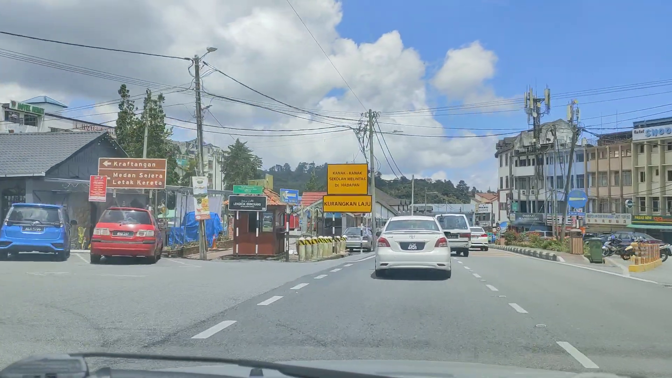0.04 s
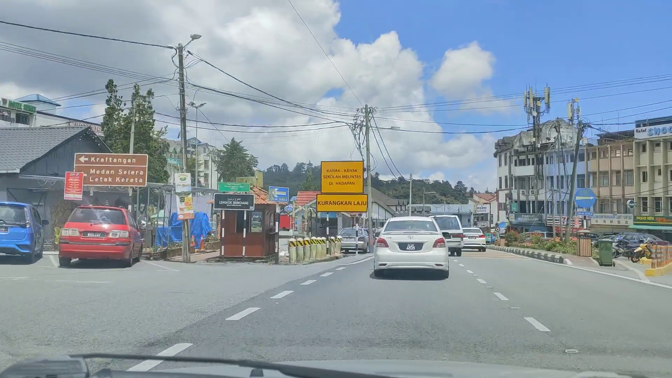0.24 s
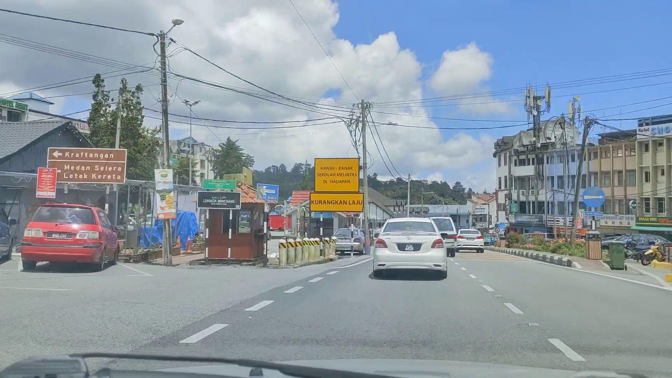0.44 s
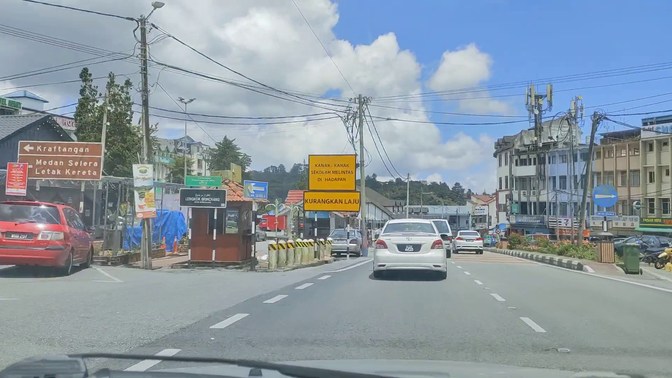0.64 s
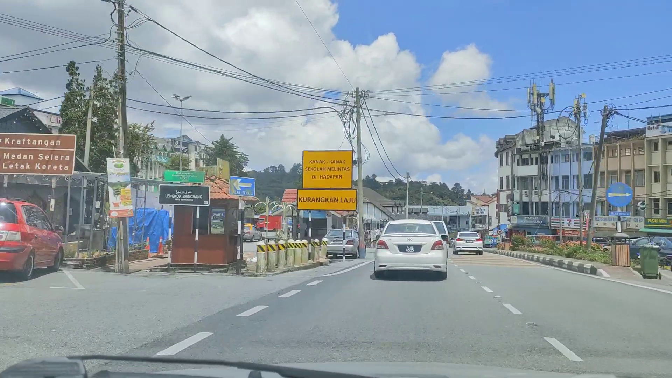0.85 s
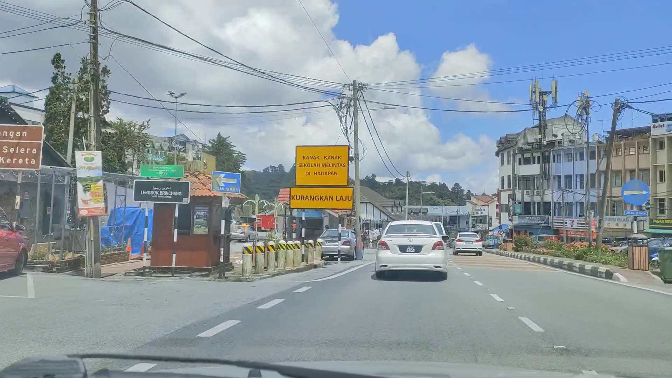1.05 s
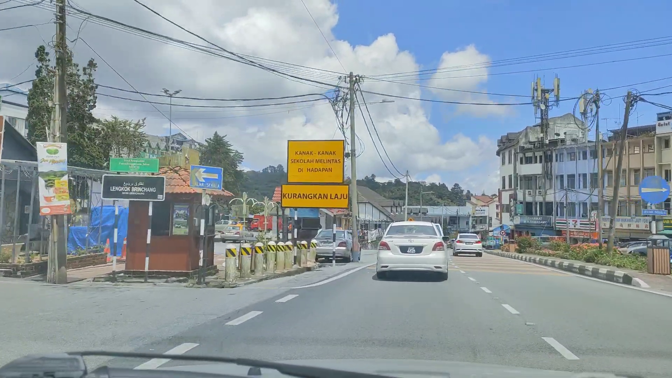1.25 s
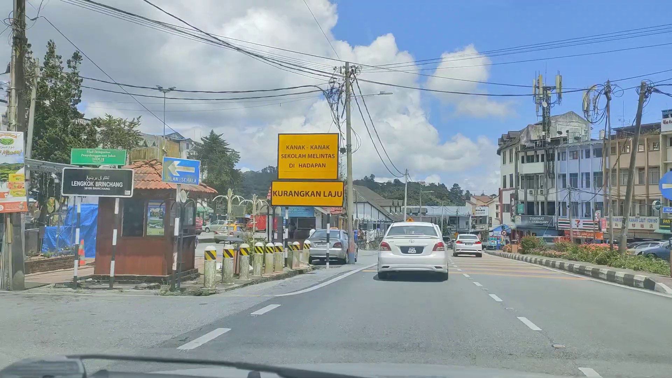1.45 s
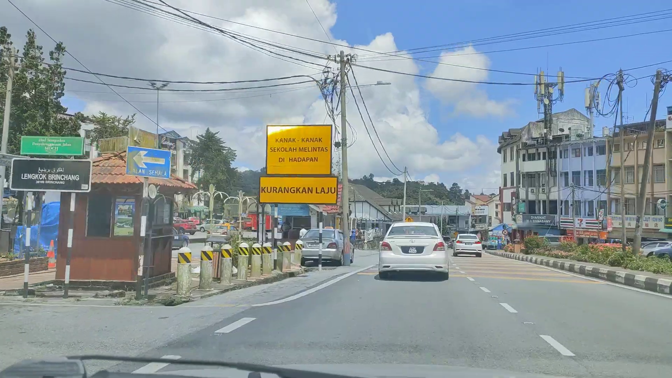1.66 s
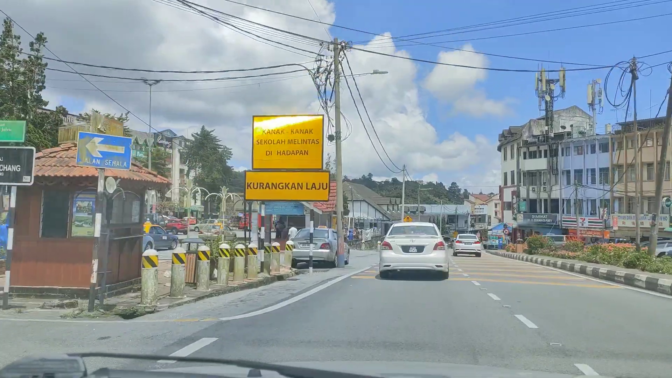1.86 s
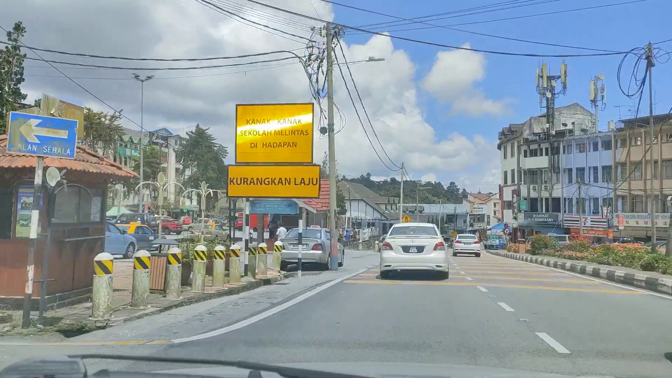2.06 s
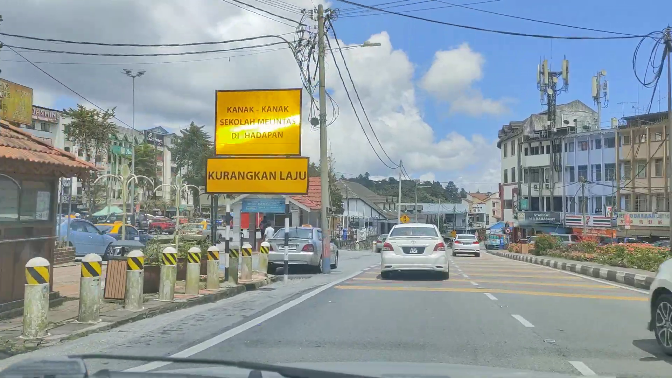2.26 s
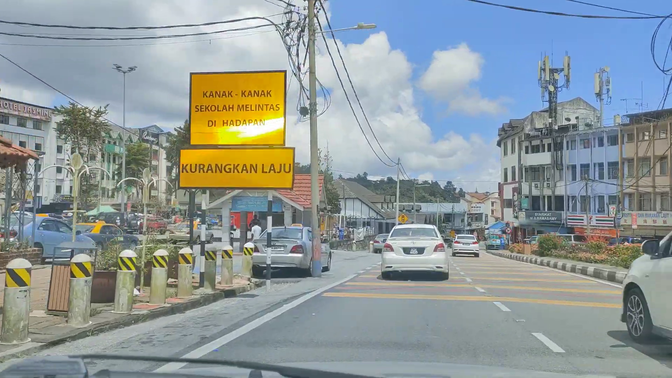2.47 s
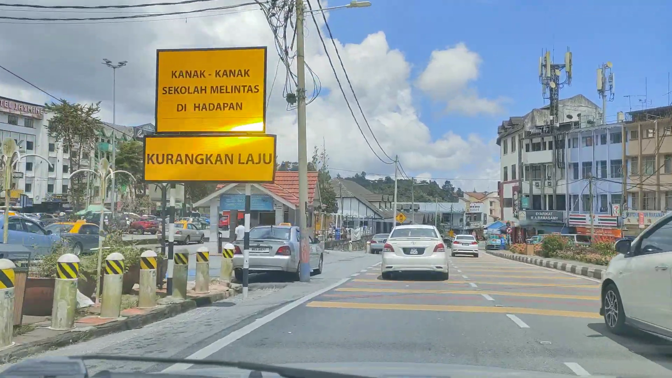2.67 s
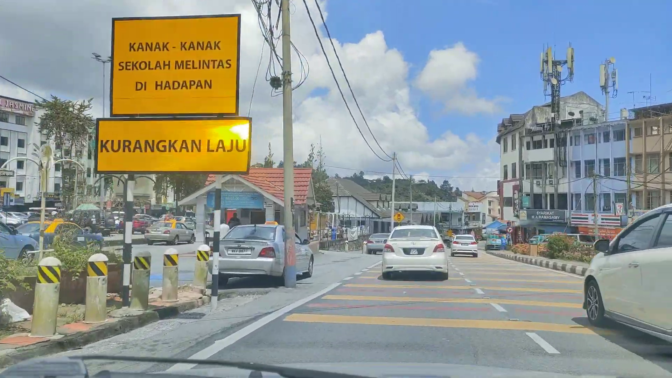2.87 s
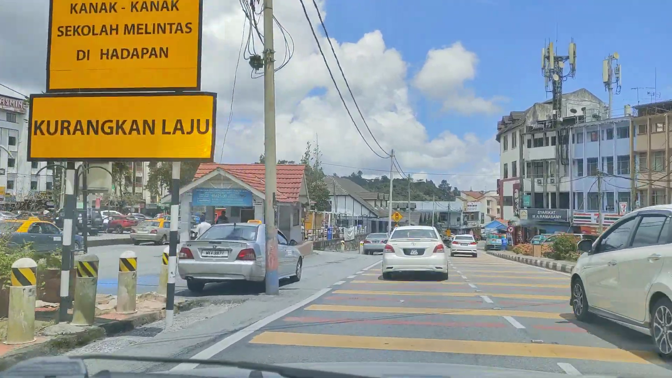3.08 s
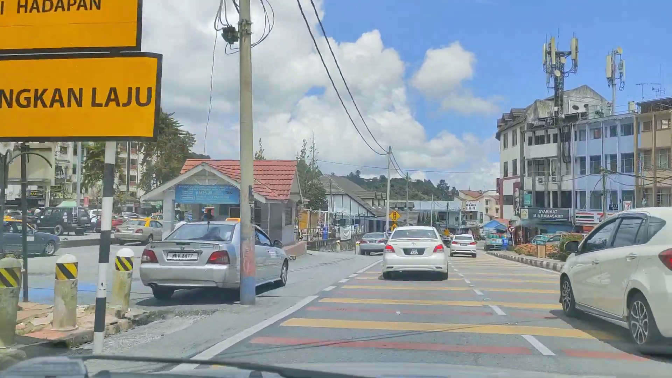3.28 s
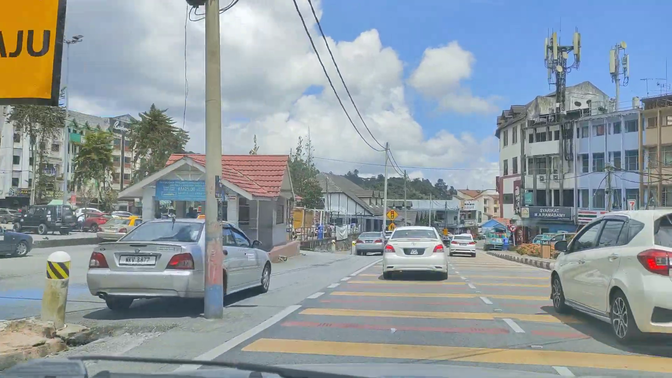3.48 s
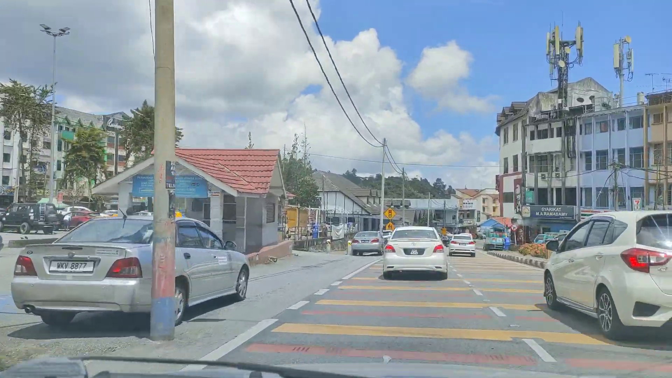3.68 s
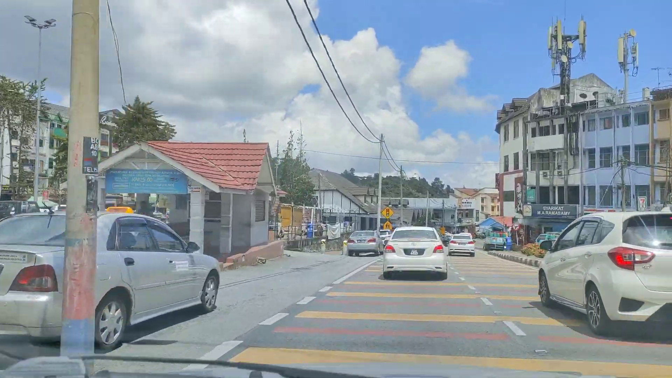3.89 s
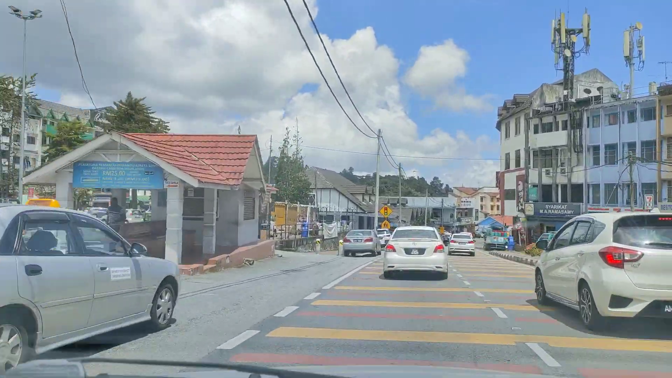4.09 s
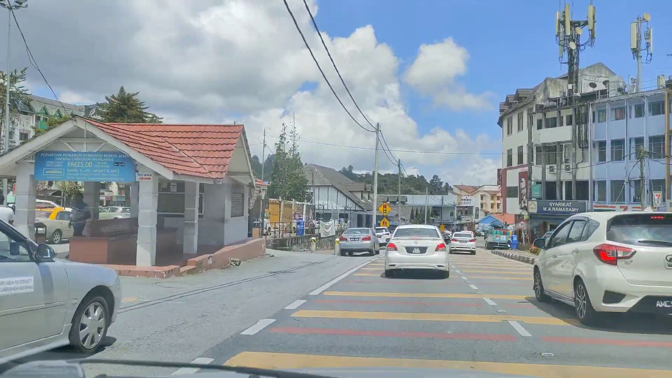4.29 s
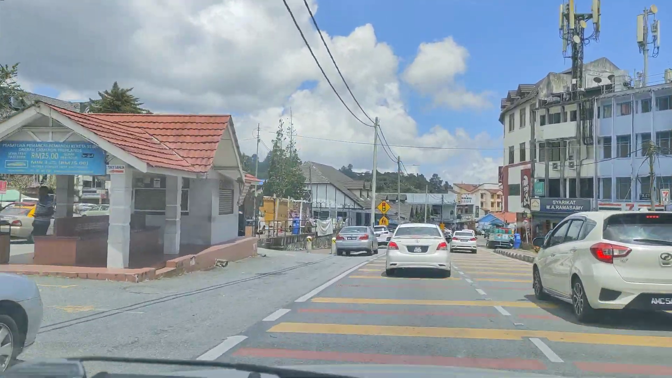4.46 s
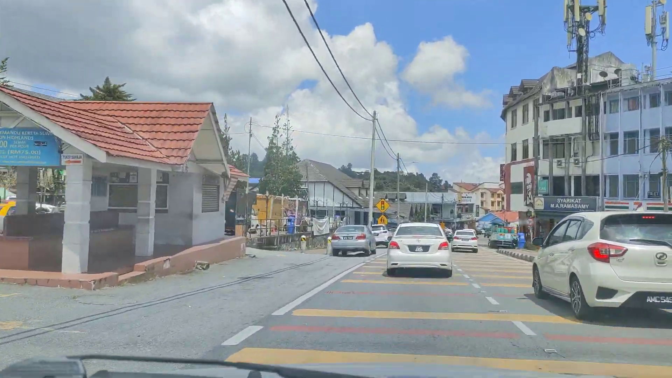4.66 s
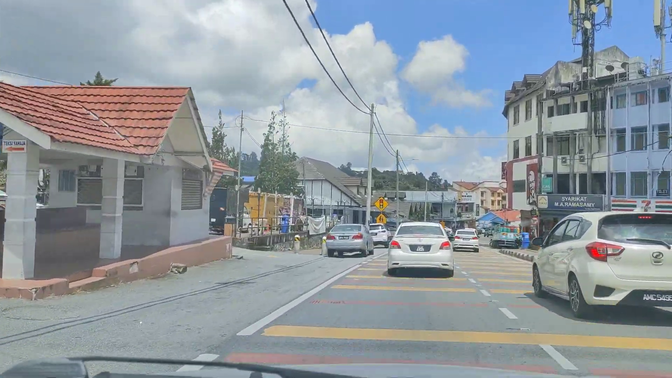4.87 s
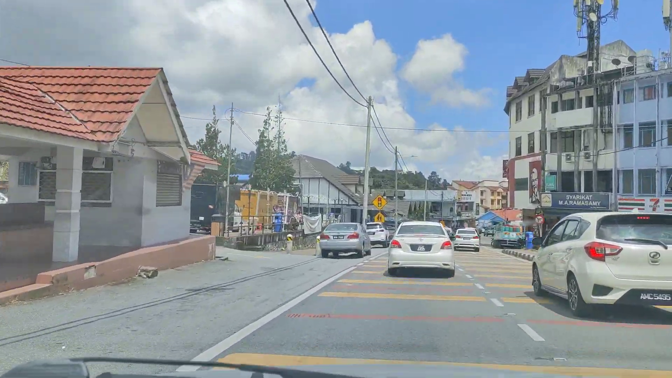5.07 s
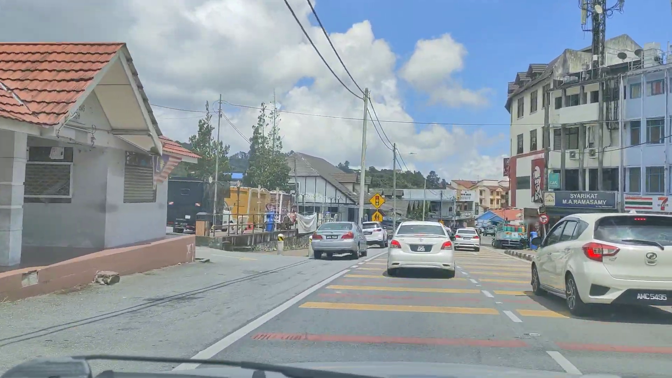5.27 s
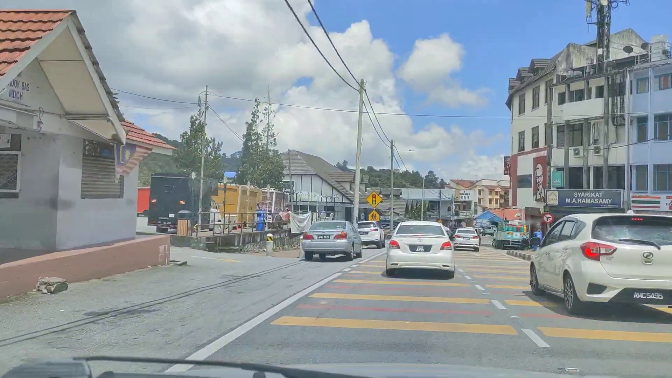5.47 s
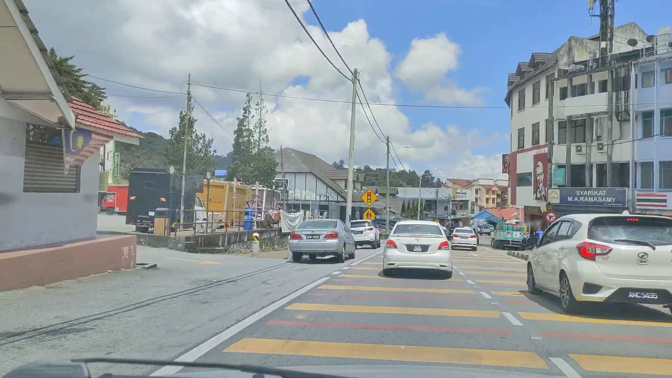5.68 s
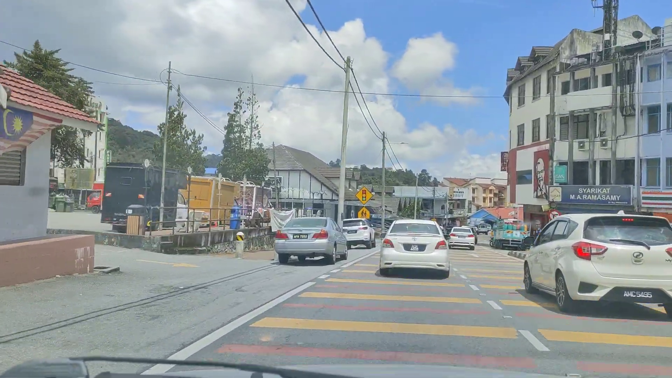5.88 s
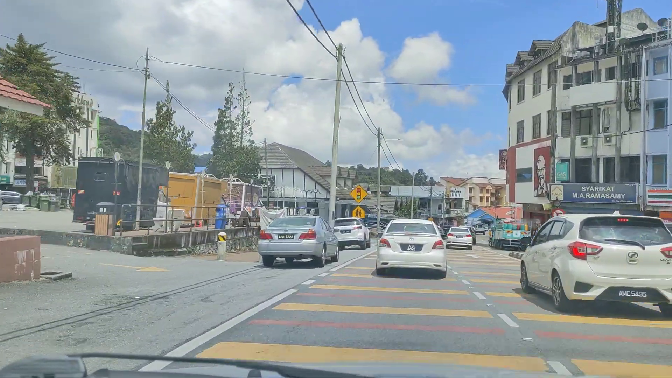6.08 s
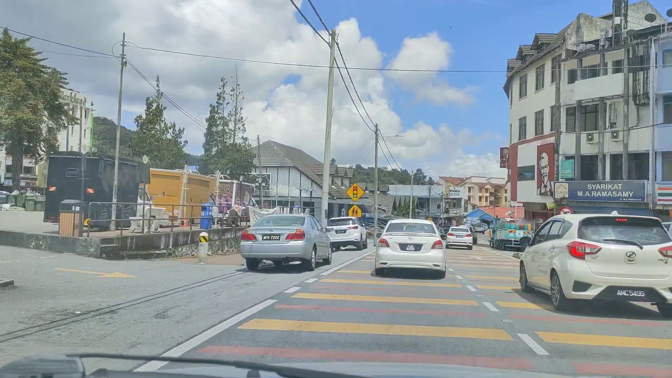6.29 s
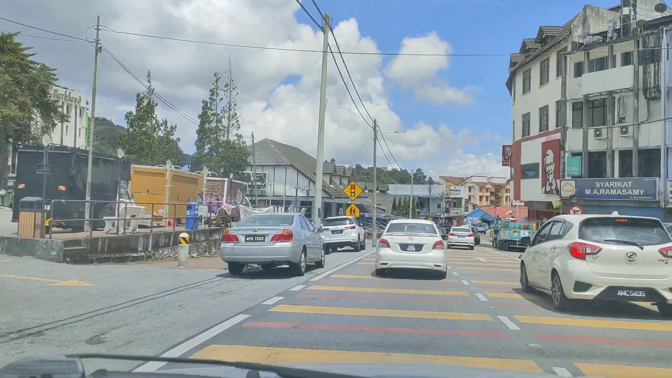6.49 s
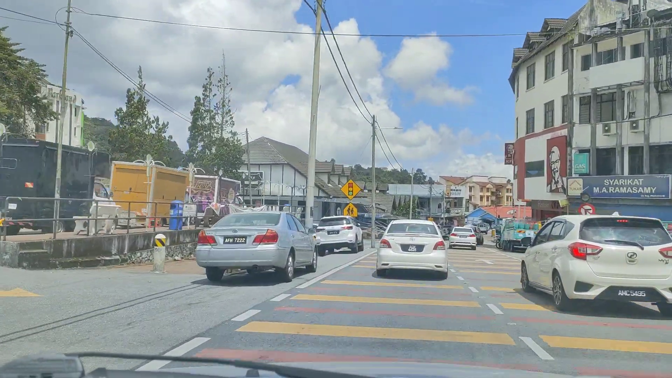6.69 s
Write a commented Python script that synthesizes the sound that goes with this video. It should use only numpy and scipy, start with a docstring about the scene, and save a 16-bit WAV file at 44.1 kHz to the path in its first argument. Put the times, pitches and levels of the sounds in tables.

```python
"""Tyre hum, with street rush and hiss, inside a slow car; a vehicle on the right adds a hollow roar.
The street fades, faint rubs chirp, then raised stripes make the cabin rumble, boom, knock and squeak.
Road, traffic and trim are shaped stereo noise; knocks, thuds and panels are struck modes; the squeak is a sine.
Table levels are relative: layer trims, filters and channel balance are applied after them."""
import sys
import numpy as np
from scipy import signal
from scipy.fft import irfft, next_fast_len
from scipy.io import wavfile
from scipy.ndimage import uniform_filter1d

SR = 44100
rng = np.random.default_rng(int(sys.argv[2]) if len(sys.argv) > 2 else 0)


def unload_audio(sound):
    """Save the sound as a 16-bit wav file, at the path given as the first command line argument."""
    columns = np.transpose(np.atleast_2d(sound))
    # keep every value between -1 and 1, then stretch to whole-number steps
    steps = np.round(np.clip(columns, -1, 1) * 32767)
    wavfile.write(sys.argv[1], SR, steps.astype(np.int16))


N = 297234
TIME = np.arange(N) / SR
PORT_LAG_S = 0.00043  # greatest delay between the two microphone ports


def from_db(db):
    """Decibels to gain."""
    return 10 ** (np.asarray(db) / 20)


def rms_one(x):
    """Scale to unit power."""
    return x / np.sqrt(np.mean(x ** 2) + 1e-20)


def filtered(x, order, hz, kind="low"):
    """Butterworth filter."""
    return signal.sosfilt(signal.butter(order, hz, kind, fs=SR, output="sos"), x)


def in_time(rows):
    """Each column of a curve, sample by sample."""
    s, *columns = np.transpose(rows)
    return [np.interp(TIME, s, column) for column in columns]


def at_hz(points, freqs):
    """A table read on a log-frequency axis."""
    hz, value = np.transpose(points)
    return np.interp(np.log(freqs), np.log(hz), value)


def cabin_colour(freqs, ripple_db=2.5, width_hz=28):
    """Reflections between windows and dashboard give each source fine peaks and dips in the treble."""
    ripple = np.interp(freqs / width_hz, np.arange(4000), rng.standard_normal(size=4000))
    return ripple_db * ripple * np.clip(freqs / 4000, 0, 1)


# likeness of the two ports: freq_hz, direct_share (sound straight from the sides)
DIRECT = [(60, 1), (200, 1), (450, 0.94), (1100, 0.44), (2300, 0.32), (3300, 0.37), (4500, 0.088),
          (8000, 0.052)]
# standing waves across the cabin, opposite in sign at the ports: freq_hz, width_hz, gain_db
CROSS_WAVES = [(660, 70, 1), (920, 81, 5.5), (1120, 150, 8.5), (1380, 70, 8)]


def cabin_noise(spectrum, tilt_db=0, from_right=0, standing=1, size=N):
    """Unit-power stereo noise: direct from the sides, partly diffuse, stirring the standing waves."""
    freqs = np.maximum(np.fft.rfftfreq(2 * next_fast_len(size // 2 + 1), 1 / SR), 1)
    octaves_outside = np.abs(np.log2(freqs / np.clip(freqs, spectrum[0][0], spectrum[-1][0])))
    shape_db = at_hz(spectrum, freqs) - 20 * octaves_outside + tilt_db * np.log2(freqs)
    gain = from_db(shape_db + cabin_colour(freqs))

    turn = 2 * np.pi * freqs * PORT_LAG_S
    lean = np.clip(from_right, -1, 1)
    alike = np.clip(at_hz(DIRECT, freqs), 0, 1) * (np.cos(turn) + 1j * lean * np.sin(turn))
    real, imaginary = rng.standard_normal((2, 2, len(freqs)))
    left, diffuse = (real + 1j * imaginary) * gain
    right = alike * left + np.sqrt(np.maximum(1 - np.abs(alike) ** 2, 0)) * diffuse

    across_db = sum(db / (1 + (2 * (freqs - hz) / width) ** 2) ** 2 for hz, width, db in CROSS_WAVES)
    difference = from_db(standing * across_db) * (left - right)
    return rms_one(irfft(left + right + difference * [[1], [-1]])[:, :size])


def steady(x, size):
    """Hold the power of a noise even over a span of samples."""
    return x / np.sqrt(uniform_filter1d(np.mean(x ** 2, axis=0), size) + 1e-9)


def grains(per_s, fade_s, spread_db):
    """Envelope of many small random contacts, each with a sharp start; unit power."""
    strength_db = abs(spread_db) * np.minimum(rng.exponential(1, N), 3)
    hits = (rng.random(N) < per_s / SR) * from_db(strength_db) ** 2
    power = signal.lfilter([1], [1, -np.exp(-1 / (fade_s * SR))], hits + 1e-12)
    return rms_one(np.sqrt(power))


def ring(clicks, hz, t60_s):
    """Two-pole resonator: each click sets off a dying sine."""
    r, w = from_db(-60 / (t60_s * SR)), 2 * np.pi * hz / SR
    return signal.lfilter([0, np.sin(w)], [1, -2 * r * np.cos(w), r * r], clicks + 1e-18)


def swell(start_s, hold_s, attack_s, t60_s):
    """Envelope that rises, holds for a length of time and dies away."""
    age = np.maximum(TIME - start_s, 0)
    return (1 - np.exp(-age / attack_s)) * from_db(-60 * np.clip((age - hold_s) / t60_s, 0, 4))


def burst(start_s, attack_s, t60_s):
    """Envelope of one blow: a quick rise and an even decay."""
    return swell(start_s, 0, attack_s, t60_s)


# tyres on smooth asphalt as the car slows: time_s, sway_db, hum_db
ROLL = [(0.12, -42, -38), (0.28, -50, -37.5), (1.15, -53, -36.5), (1.55, -49.5, -39), (2.05, -54, -40.5),
        (2.6, -57.5, -42), (3.2, -61, -41), (3.85, -55, -41.5)]
# traffic outside, falling behind: time_s, rush_db, hiss_db
TRAFFIC = [(0, -48, -57.5), (0.2, -48.5, -50.5), (0.7, -48, -58), (1.15, -49, -56), (1.6, -53.5, -60.5),
           (2.15, -55, -60.5), (2.7, -55.5, -67), (3.45, -54, -63), (3.85, -55.5, -62.5)]
# spectra of body sway, tyre hum and street noise: freq_hz, density_db (per Hz)
SWAY = [(18, -14), (33, -6), (44, 12.5), (60, -5), (80, -9), (110, -20)]
HUM = [(55, -28), (82, -14.5), (102, -5.5), (150, -2.5), (195, -1), (245, -4), (295, -8.5), (350, -8.5),
       (420, -14), (500, -11), (600, -15), (750, -32), (1000, -27)]
RUSH = [(300, -26), (520, -3.5), (640, -4.5), (750, 0), (1020, -4.5), (1320, -5.5), (1500, -8.5),
        (1750, -11.5), (1900, -16.5), (2600, -20.5), (4000, -24)]
HISS = [(1200, -11), (1900, -3), (2450, 0.5), (3000, -5.5), (3700, -3), (4400, -10.5), (5100, -10),
        (5800, -12), (6500, -16.5), (7400, -30), (10000, -31.5), (13500, -56)]
AIR = [(2200, 1), (2650, -0.5), (3200, -7), (4500, -8.5), (5700, -4.5), (7000, -14), (10000, -20),
       (13500, -27.5)]


def smooth_road():
    """Tyre hum through the body, street rush, and hiss stronger on the right, all as shaped noise."""
    sway_db, hum_db = in_time(ROLL)
    rush_db, hiss_db = in_time(TRAFFIC)
    sway = from_db(sway_db) * steady(cabin_noise(SWAY), size=9000)
    hum = from_db(hum_db + 1.0) * steady(cabin_noise(HUM), size=11000)
    rush = from_db(rush_db + 5.0) * cabin_noise(RUSH, from_right=0.22)
    hiss = from_db(hiss_db + 1.5) * cabin_noise(HISS, from_right=0.38)
    # falls 15 dB per second as the traffic recedes
    air = from_db(-52.0 - 15.0 * TIME) * cabin_noise(AIR, from_right=0.96)
    return sway + hum + rush + (hiss + air) * from_db([[-.8], [.5]])


# tyre roar of the other vehicle, near and abreast: freq_hz, density_db (per Hz)
ROAR = [(480, -15), (600, -2.5), (740, -6), (880, 3.5), (1130, -6), (1300, -9), (1500, -19), (1950, -21),
        (2500, -10), (2950, -13), (3400, -20)]
ROAR_ABREAST = [(900, -6), (1040, 8), (1170, 6.5), (1330, 5), (1480, 1), (1750, -4), (2000, -22),
                (2800, -14), (3400, -17)]


def passing(fade_s=1.22, fade_width_s=0.15, abreast_s=1.08, abreast_width_s=0.4):
    """A vehicle on the right: hollow tyre roar, with a higher, grainy swell just before it drops behind."""
    nearness = 1 / (1 + np.exp(np.minimum((TIME - fade_s) / fade_width_s, 30)))
    abreast = np.exp(-((TIME - abreast_s) / abreast_width_s) ** 2)
    roar = from_db(-45.5) * nearness * cabin_noise(ROAR, from_right=0.68)
    upper_roar = from_db(-46.5) * abreast * cabin_noise(ROAR_ABREAST, from_right=0.99)
    upper_roar = upper_roar * grains(per_s=250, fade_s=.014, spread_db=0.0)
    return roar * from_db([[-.8], [.5]]) + upper_roar * from_db([[1.3], [-1.1]])


# faint chirps of rubbing trim: middle_s, pitch_hz, half_width_hz, level_db, length_s
CHIRPS = [(1.86, 1340, 220, -60, .08), (1.922, 4250, 200, -57.5, 0.03), (2.0, 4050, 240, -65, 0.18),
          (3.393, 910, 110, -57, .08), (3.4, 2600, 190, -64, 0.13), (3.418, 5120, 12, -72.5, .08),
          (4.95, 7000, 190, -68, .033), (5.024, 7000, 130, -70, 0.027), (5.604, 3670, 400, -56.5, 0.046),
          (6.07, 3700, 600, -59, 0.11), (6.185, 4160, 97, -62, .017)]


def chirps():
    """Brief rubs shake one narrow resonance each: band-passed noise under a bell-shaped envelope."""
    out, white = np.zeros((2, N)), rng.standard_normal((2, N))
    for middle_s, hz, half_width_hz, level_db, length_s in CHIRPS:
        near = np.abs(TIME - middle_s) < 2 * length_s
        tone = filtered(white[:, near], 2, [hz - half_width_hz, hz + half_width_hz], "band")
        bell = np.exp(-(2 * (TIME[near] - middle_s) / length_s) ** 2)
        out[:, near] += from_db(level_db) * bell * rms_one(tone)
    return out


# the squeak's upward glide: time_s, pitch_hz, level_db, overtone_db (relative to the fundamental)
SQUEAK = [(4.582, 5680, -54, -42), (4.597, 5870, -44, -43.5), (4.607, 5935, -47.5, -46),
          (4.64, 5940, -52, -46), (4.669, 5990, -51.5, -42), (4.705, 5980, -55, -40),
          (4.735, 5994, -60, -37), (4.765, 6030, -52, -37), (4.79, 6060, -58, -33), (4.809, 6105, -51, -37)]
SQUEAK_HOLD_S, SQUEAK_ATTACK_S, SQUEAK_T60_S = 0.229, .004, .05


def squeak(jitter=.0007, flutter_db=2.5):
    """A dry contact sticks and slips: one high, slightly unsteady sine with its octave."""
    hz, level_db, overtone_db = in_time(SQUEAK)
    waver = rms_one(filtered(rng.standard_normal((3, N)), 2, 70))
    phase = 2 * np.pi * np.cumsum(hz * (1 + jitter * waver[0])) / SR
    phase = phase - 2 * np.pi * hz * PORT_LAG_S * np.array([[1], [0]])  # right port first
    tone = np.sin(phase) + from_db(overtone_db) * np.sin(2 * phase)
    sounding = swell(SQUEAK[0][0], SQUEAK_HOLD_S, SQUEAK_ATTACK_S, SQUEAK_T60_S)
    return sounding * tone * from_db(level_db + flutter_db * waver[1:] + np.array([[-3.0], [6.0]]))


# loose trim clacking: start_s, level_db, brightness_db_per_octave, t60_s
CLACKS = [(4.116, -45, 1, 0.058), (4.12, -34, -1, 0.13), (4.141, -46.5, 2.5, 0.24), (4.231, -41, 4.5, 0.11),
          (4.25, -56, 4, 0.2), (4.44, -34.5, -4, 0.031), (4.494, -44, 0, 0.032), (4.628, -48.5, 7, 0.21),
          (4.848, -31, -6, 0.034), (4.872, -43, 2, 0.083), (4.94, -48, -1.5, 0.15), (4.952, -38, 0, 0.035),
          (5.012, -43.5, -7, 0.32), (5.225, -47.5, 1.5, 0.24), (5.252, -44, 0, 0.054),
          (5.591, -51, 1, 0.24), (6.178, -46.5, 7.5, 0.088), (6.529, -51, 4.5, 0.097)]
# trim spectrum, also used by the chatter: freq_hz, density_db (per Hz)
TRIM = [(900, 1), (1600, 3.5), (1950, 0), (2400, 2.5), (3000, 0), (3800, -1), (4600, -7), (5800, -8.5),
        (7300, -19), (10000, -26.5), (13500, -37.5)]


def clacks():
    """Plastic parts slap together; a decaying noise burst stands for their many dense modes."""
    out = np.zeros((2, N))
    for start_s, level_db, bright_db, t60_s in CLACKS:
        start = int(start_s * SR)
        end = min(start + SR // 2, N)
        envelope = burst(start_s, attack_s=0.0016, t60_s=t60_s)[start:end]
        out[:, start:end] += from_db(level_db) * envelope * cabin_noise(TRIM, bright_db, size=end - start)
    return out


def buzzing(shake, depth=0.18):
    """Loose trim touches: the level peaks once in each swing of the body; unit power."""
    swing = np.cos(np.angle(signal.hilbert(shake, next_fast_len(N))[:N]))
    return rms_one(np.exp(depth * swing))


# wheel over a raised stripe: start_s, on_paint_s, rumble_db, boom_db, drone_db, scrub_db
STRIPES = [(3.905, 0.044, -40, -47.5, -60, -62), (4.116, 0.082, -29.5, -36.5, -35, -54),
           (4.21, 0.026, -51, -41, -58, -66), (4.451, 0.11, -29.5, -37.5, -33, -43),
           (4.572, 0.12, -28.5, -39, -34.5, -47.5), (4.834, 0.12, -29, -29, -32.5, -44),
           (4.984, 0.042, -32, -38, -34, -48), (5.145, 0.045, -38, -42, -34, -47),
           (5.183, 0.12, -35, -30, -35, -44.5), (5.335, 0.042, -33, -29.5, -36, -52),
           (5.53, 0.17, -30.5, -33.5, -33, -51), (5.732, 0.088, -27, -36.5, -48, -67),
           (5.928, 0.057, -32.5, -35.5, -35.5, -55), (6.059, 0.12, -29, -41.5, -48, -52),
           (6.44, 0.065, -36, -38, -44, -68), (6.478, 0.17, -34.5, -40, -35.5, -52.5)]
# coarseness of the surface between the stripes: time_s, coarseness_db
COARSENESS = [(3.85, -8.5), (4.4, -7), (4.75, 2), (5.05, 4), (5.48, -1.5), (5.8, -3), (6.33, -4.5),
              (6.74, 1)]
STRIPE_ATTACK_S = 0.0033


def shaking_db(bed, stripe_db, lead_s, t60_s):
    """Level of one vibration: a bed that follows the coarse surface, plus a swell for each stripe."""
    bed_db, follows = bed
    coarse_db, = in_time(COARSENESS)
    power = from_db(bed_db + follows * coarse_db) ** 2
    for (start_s, on_paint_s, *_), db in zip(STRIPES, stripe_db):
        envelope = swell(start_s - lead_s, on_paint_s + lead_s, STRIPE_ATTACK_S, t60_s)
        power = power + (from_db(db) * envelope) ** 2
    return 10 * np.log10(power)


# spectra of suspension, cabin, cabin-air ring, floor panels and tread: freq_hz, density_db (per Hz)
BOOM = [(12, -9), (24, 0), (33, -4.5), (42, -4.5), (52, -6), (66, -3.5), (85, -7), (105, -16.5), (130, -32)]
RUMBLE = [(60, -22), (95, -10.5), (125, 2), (165, 2.5), (205, 2.5), (232, -10), (280, -12.5), (400, -18),
          (600, -31)]
CABIN_RING = [(125, -20), (148, -5), (163, -1.5), (176, -6.5), (194, -5.5), (215, -25.5)]
PANELS = [(200, -17), (265, 6), (305, -5.5), (335, 0.5), (385, -3.5), (440, -9), (545, -9), (640, -23)]
SCRUB = [(330, -13.5), (470, 0.5), (560, 0), (640, -7), (800, -5.5), (1000, -9.5), (1180, -10), (1450, -17),
         (1800, -23.5), (2600, -35), (4000, -41)]
# beds: (level_db, share of the coarseness followed)
BOOM_BED, RUMBLE_BED, DRONE_BED = (-42.5, 1.3), (-31.5, 0.8), (-39.5, 0.79)
SCRUB_BED, CHATTER_BED = (-48, .3), (-59, 0.39)
STRIPE_T60_S = 0.13
BOOM_LEAD_S, BOOM_T60_S = 0.004, 0.28  # the suspension takes the load first and settles last
CHATTER_UNDER_SCRUB_DB = -13.5  # stripe swells, before the layer trims


def striped_road():
    """Rough paint shakes suspension, cabin and floor panels; the tread scrubs and the trim chatters."""
    _, _, rumbles, booms, drones, scrubs = np.transpose(STRIPES)
    boom_db = shaking_db(BOOM_BED, booms, BOOM_LEAD_S, BOOM_T60_S)
    rumble_db = shaking_db(RUMBLE_BED, rumbles, 0, STRIPE_T60_S)
    drone_db = shaking_db(DRONE_BED, drones, 0, STRIPE_T60_S)
    scrub_db = shaking_db(SCRUB_BED, scrubs, 0, STRIPE_T60_S)
    chatter_db = shaking_db(CHATTER_BED, scrubs + CHATTER_UNDER_SCRUB_DB, 0, STRIPE_T60_S)

    boom = from_db(boom_db) * steady(cabin_noise(BOOM), size=3500)
    broad_rumble = from_db(rumble_db - 3.5) * steady(cabin_noise(RUMBLE), size=1800)
    air_ring = from_db(rumble_db - 6.0) * steady(cabin_noise(CABIN_RING), size=1800)
    rumble = broad_rumble + air_ring
    drone = from_db(drone_db - 0.5) * steady(cabin_noise(PANELS, from_right=0.5), size=1400)
    scrub = from_db(scrub_db + 2.5) * cabin_noise(SCRUB, from_right=0.39, standing=0.78)
    scrub = scrub * grains(per_s=520, fade_s=0.026, spread_db=5.0)
    chatter = from_db(chatter_db + 4.0) * cabin_noise(TRIM, standing=0.79)
    chatter = chatter * grains(per_s=390, fade_s=0.02, spread_db=2.5) * buzzing(rumble[0])
    return boom + rumble + drone + scrub + chatter


# door and floor panels: freq_hz, level_db, t60_s
PANEL_MODES = [(460, 2, .07), (558, -2.5, .08), (664, -1.5, .07), (756, -10, .07), (890, -4, .05),
               (930, 1, 0.16), (1095, -13, .08), (1140, -16.5, .06), (1310, -10, 0.054), (1320, -15, .05)]


def slaps(smack_db=-1.0, ring_db=-7.0, mode_spread_db=4.5):
    """The soft tread smacks each edge (noise) and rings the panels (modes, right port first)."""
    start_s, _, _, slap_db, _ = np.transpose(KNOCKS)
    envelope = sum(from_db(db) * burst(s, attack_s=0.0017, t60_s=0.067) for s, db in zip(start_s, slap_db))
    rings = 0
    for hz, mode_db, t60_s in PANEL_MODES:
        pushes = np.zeros(N)
        signs = rng.choice([-1, 1], len(start_s))
        luck_db = mode_spread_db * rng.standard_normal(len(start_s))
        pushes[(start_s * SR).astype(int)] = signs * from_db(slap_db + ring_db + mode_db + luck_db)
        rings = rings + filtered(ring(pushes, hz, t60_s), 1, [0.85 * hz, 1.76 * hz], "band")
    at_ports = np.array([np.interp(TIME - PORT_LAG_S, TIME, rings), rings])
    smack = cabin_noise(SCRUB, tilt_db=3.0, from_right=0.28, standing=.7)
    return at_ports + from_db(smack_db) * envelope * smack


# the suspension drops off an edge: start_s, push_db
THUDS = [(4.122, -38), (4.856, -15), (4.927, -17.5), (4.997, -24), (5.15, -17.5), (5.283, -24),
         (5.53, -21.5), (5.655, -26), (6.514, -26), (6.63, -22)]
THUD_HZ, THUD_T60_S, THUD_SOFT_HZ = 51, 0.19, 90


def thuds():
    """The springs catch the wheel and heave the cabin air: one low, softened, fast-dying resonance."""
    start_s, push_db = np.transpose(THUDS)
    pushes = np.zeros(N)
    pushes[(start_s * SR).astype(int)] = from_db(push_db)
    return filtered(ring(pushes, THUD_HZ, THUD_T60_S), 2, THUD_SOFT_HZ)


# wheels hitting edges: start_s, level_db, hardness_db_per_octave, slap_db (tread), pitch_hz (thump)
KNOCKS = [(2.824, -32, 5, -55, 177), (3.868, -27.5, 0, -58, 176), (3.917, -21.5, -14, -46, 176),
          (4.074, -27.5, -1, -49, 170), (4.121, -17.5, -10, -36.5, 184), (4.136, -19, -7, -37, 138),
          (4.16, -20.5, 5.5, -52, 194), (4.305, -23.5, -2, -54, 175), (4.342, -20.5, 1, -42, 153),
          (4.469, -17.5, 5, -48, 168.5), (4.486, -19, 5.5, -45, 172.5), (4.498, -25, 10, -25.5, 176),
          (4.504, -22.5, -3, -42, 225), (4.545, -18.5, -5, -42, 175), (4.575, -23.5, 7, -31.5, 164),
          (4.655, -17.5, 5, -51, 156), (4.695, -16.5, 1.5, -51, 160), (4.783, -18.5, -8, -48, 150),
          (4.819, -10.5, -6.5, -50, 186), (4.843, -22, 12, -31.5, 142), (4.862, -17, 5, -35.5, 207),
          (4.881, -21, -8, -46, 164), (4.921, -24, 5, -33.5, 182), (4.927, -15, 3, -43, 160),
          (4.997, -15, -2, -28.5, 164.5), (5.011, -32, 9, -33, 175), (5.076, -27.5, 9.5, -40, 184),
          (5.193, -15, 1, -32, 164), (5.215, -17, -10, -29.5, 184), (5.278, -21.5, 12, -38, 150),
          (5.285, -19.5, 1, -49, 163), (5.575, -14.5, -1, -32.5, 189), (5.645, -27, 11.5, -35.5, 218),
          (5.664, -29, 3, -46, 187), (5.933, -36, 15.5, -45, 176), (6.024, -22, 11, -38.5, 140),
          (6.092, -24, -2, -50, 150), (6.124, -13.5, -3, -40, 169), (6.167, -24, 5, -39, 184),
          (6.51, -23, 3, -34.5, 183), (6.581, -26.5, 9.5, -49, 236), (6.633, -11, -4.5, -52, 186),
          (6.653, -30, 6, -37.5, 197)]
# body panels and cabin air: freq_hz, level_db, t60_s
BODY_MODES = [(42, -46.5, 0.045), (138.7, 2, 0.024), (176.7, 6, 0.052), (204, 3, 0.035), (287, -5, 0.037),
              (344, -12, 0.045), (404, -23, 0.049), (510, -23, 0.049)]
KNOCK_HZ = 173.1  # thump pitch that leaves the modes unshifted


def knocks(soft_hz=470, mode_spread_db=1.5, side_spread_db=1.1):
    """Each edge gives a rubber-softened push that rings the body; mode pitch and mix vary per knock."""
    out, push = np.zeros((2, N + SR)), signal.unit_impulse(SR // 4)
    for start_s, level_db, hardness_db, _, pitch_hz in KNOCKS:
        start, shift = int(start_s * SR), pitch_hz / KNOCK_HZ
        for k, (hz, mode_db, t60_s) in enumerate(BODY_MODES):
            luck_db = mode_spread_db * rng.standard_normal() + side_spread_db * rng.standard_normal((2, 1))
            gain = from_db(level_db + mode_db + 1.5 + hardness_db * np.log2(hz / KNOCK_HZ) + luck_db)
            # panels radiate little far below their own pitch
            radiated = filtered(ring(push, hz * shift, t60_s), 1, 0.46 * hz, "high")
            # neighbouring modes start in opposition, so a knock swells for a cycle
            out[:, start:start + len(push)] += (-1) ** k * gain * radiated
    return filtered(out[:, :N], 2, soft_hz)


STRIPES_FROM_S, STRIPES_FADE_S = 3.8, 0.092


def scene():
    """Smooth asphalt gives way to the stripes; the right is raised slightly, except for the squeak."""
    on_stripes = np.clip((TIME - STRIPES_FROM_S) / STRIPES_FADE_S, 0, 1)
    road = np.sqrt(1 - on_stripes) * smooth_road() + np.sqrt(on_stripes) * striped_road()
    impacts = knocks() + thuds() + slaps() + clacks()
    return (road + passing() + impacts + chirps()) * from_db([[-.8], [.7]]) + squeak()


CUTOFF_HZ = 13600


def record(dry):
    """The microphone drops the deepest bass; the top is cut steeply."""
    thinned = filtered(dry, 2, 16, "high")
    return signal.sosfilt(signal.ellip(10, .1, 80, CUTOFF_HZ, fs=SR, output="sos"), thinned)


dry = scene()
out = record(dry)
unload_audio(out)
```